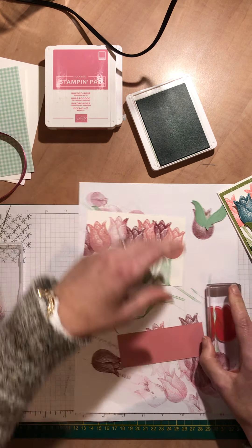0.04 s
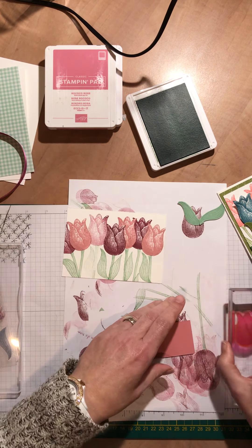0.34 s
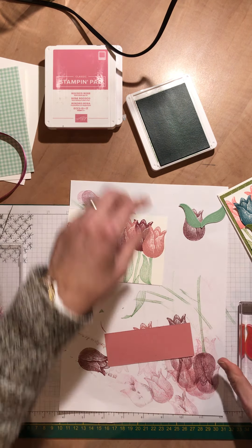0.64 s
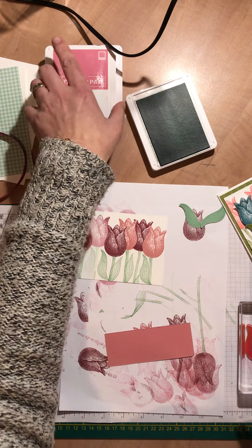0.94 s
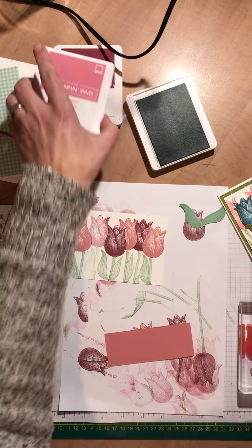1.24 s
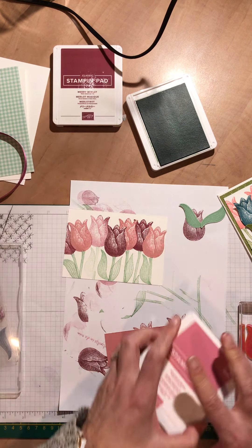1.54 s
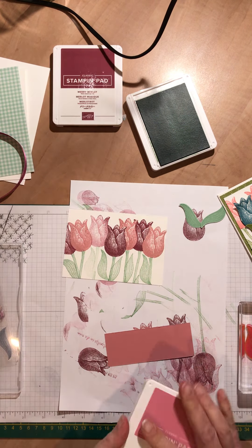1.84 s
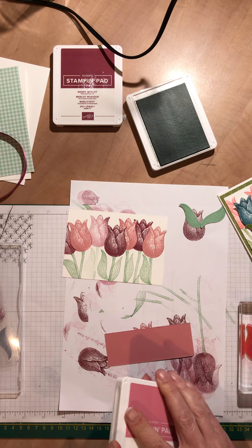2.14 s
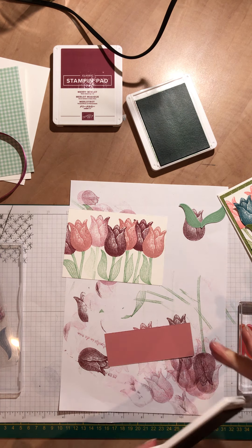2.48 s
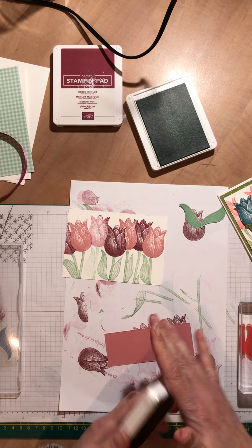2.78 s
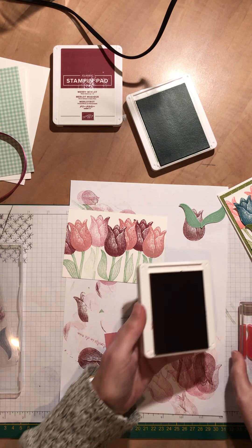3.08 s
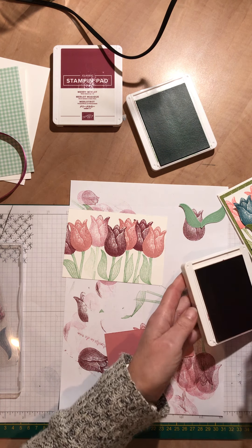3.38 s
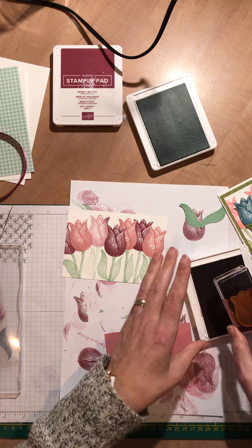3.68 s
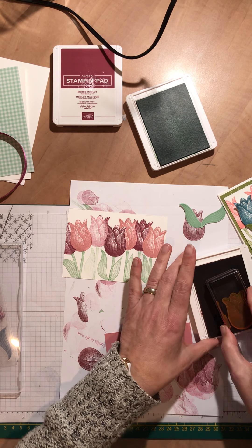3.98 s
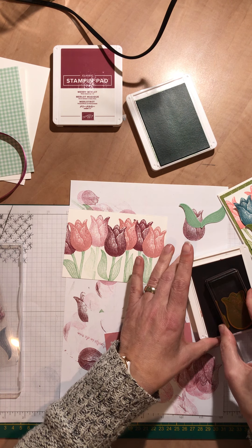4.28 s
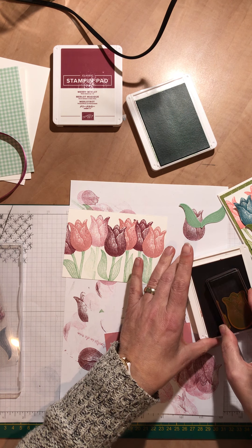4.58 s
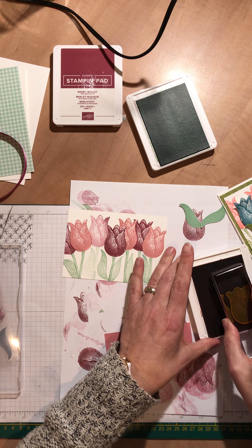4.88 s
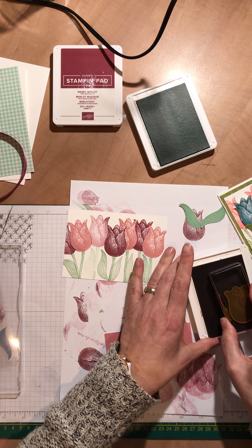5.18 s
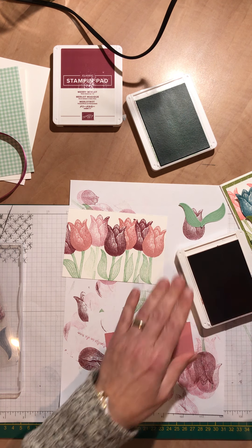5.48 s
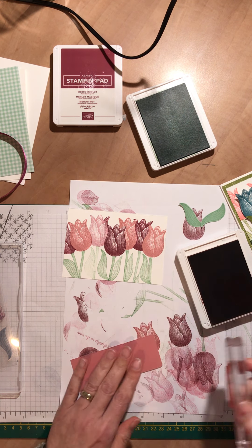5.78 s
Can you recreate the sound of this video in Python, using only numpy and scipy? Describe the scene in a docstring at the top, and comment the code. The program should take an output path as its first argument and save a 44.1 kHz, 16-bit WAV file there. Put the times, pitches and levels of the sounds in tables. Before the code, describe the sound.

A card rustles faintly over paper. A hollow plastic ink pad case is picked up with light clacks and scrapes, and its lid clicks, gives a tiny high squeak and snaps open. The case is set down on a wooden table, then a stamp block lands on it with a sharp, ringing crack and is dabbed in, each push a soft low thump. The card rustles again. The sounds are close, in a small, quiet room.

```python
"""A plastic ink pad case is handled on a wooden craft table: its hollow shell clacks and scrapes,
and its lid clicks, squeaks as it sticks and slips, and snaps open. The case is set down, then a
clear stamp block lands on the pad with a ringing crack and is dabbed into it.
Each push makes the table top boom softly. At the start and the end a card rustles over paper.
Underneath lie the short reverb and quiet rumble of a small room."""
import sys
import numpy as np
from scipy import signal
from scipy.fft import rfft, irfft
from scipy.io import wavfile
from scipy.ndimage import uniform_filter1d

SR = 44100
rng = np.random.default_rng(int(sys.argv[2]) if len(sys.argv) > 2 else 0)


def to_wav(s):
    """Save 16-bit WAV."""
    ch = np.atleast_2d(s).T  # columns
    pcm = np.round(np.clip(ch, -1, 1) * 32767)  # PCM
    wavfile.write(sys.argv[1], SR, pcm.astype(np.int16))


N = 261336
TIME = np.arange(N) / SR
HIT_TIME = np.arange(SR // 2) / SR  # seconds since a hit


def amp(db):
    """Decibels to gain."""
    return 10 ** (np.asarray(db) / 20)


def unit_rms(x):
    """Scales to rms 1."""
    return x / np.sqrt(np.mean(x ** 2) + 1e-20)


def curve_at(points, hz):
    """Reads a curve on a log-frequency axis."""
    f, value = np.transpose(points)
    return np.interp(np.log(hz + 1), np.log(f + 1), value)


def fade(t, t60):
    """Exponential decay, 60 dB down after t60 seconds."""
    return np.exp(-np.log(1000) * t / np.maximum(t60, 1e-3))


def add(mix, s, sound):
    """Mixes a sound in at s seconds."""
    start = round(s * SR)
    sound = sound[max(-start, 0):]
    part = mix[max(start, 0):][:len(sound)]
    part += sound[:len(part)]


def eq(x, curve):
    """Causal filter through (Hz, dB) points, so attacks stay sharp."""
    size = 4096
    log_gain = np.log(amp(curve_at(curve, abs(np.fft.fftfreq(size, 1 / SR)))))
    minimum_phase = np.exp(np.conj(signal.hilbert(log_gain)))
    taps = np.fft.ifft(minimum_phase).real
    return signal.fftconvolve(x, taps[:size // 2])[:len(x)]


def burst(decay):
    """Countless close, damped modes: dying noise of energy 1, its deepest notches filled."""
    spectrum = rfft(rng.standard_normal(len(HIT_TIME)) * fade(HIT_TIME, decay))
    evened = spectrum / np.sqrt(abs(spectrum) + 1e-12)
    x = irfft(evened, len(HIT_TIME)) * fade(HIT_TIME, decay * 10)
    return x / np.linalg.norm(x)


def ping(hz, t60):
    """One damped mode."""
    return np.sin(2 * np.pi * hz * HIT_TIME) * fade(HIT_TIME, t60)


def ring(modes):
    """Damped modes after one hit; neighbours swing against each other."""
    return sum((-1) ** k * amp(db) * ping(hz, t60) for k, (hz, db, t60) in enumerate(modes))


def friction(curve, grain_db, grain_s=0.0015):
    """A stream of tiny catches of uneven size, clumped where the surface is rougher."""
    catches = unit_rms(uniform_filter1d(rng.standard_normal(N), size=round(grain_s * SR)))
    clumps = unit_rms(uniform_filter1d(rng.standard_normal(N), size=400))
    grains = rng.standard_normal(N) * amp(grain_db * (catches + 0.53 * clumps))
    return unit_rms(eq(grains, curve))


def strokes(rows, layer):
    """Envelope for level column 0 or 1: each stroke sets in, swells or sags, and lets go."""
    gain = np.zeros(N)
    for s, length, *levels_db, swell_db in rows:
        t = TIME - s
        ease = .1 * length  # longer strokes start and stop more gently
        attack = np.maximum(-t, 0) / (.01 + ease)
        release = np.maximum(t - length, 0) / (.022 + ease)
        ramp_db = swell_db * (np.clip(t / length, 0, 1) - .5)
        gain += amp(levels_db[layer] + ramp_db - 20 * np.minimum(attack + release, 10))
    return gain


# Room tone EQ. Each row: frequency in Hz, gain in dB.
ROOM_TONE_EQ = [(15, -41.5), (25, -14.5), (59, 1), (141, -14.5), (242, -13.5), (277, -11.5), (394, -21),
                (476, -28), (560, -27), (988, -30.5), (1100, -32), (1330, -32.5), (2840, -37.5),
                (12200, -43), (16000, -46)]

def room_tone(level_db=-62):
    """A steady bed of low rumble and faint hiss."""
    return amp(level_db) * unit_rms(eq(rng.standard_normal(N), ROOM_TONE_EQ))


# Reverb decay. Each row: frequency in Hz, t60 in seconds.
REVERB_DECAY = [(100, 0.76), (300, 0.6), (800, 0.37), (2000, 0.39), (5000, 0.33), (13000, 0.24)]

def reverb(x, wet_db=-10.5, build_s=0.0032):
    """Dense wall reflections that swell quickly and die sooner in the treble."""
    hz, t, bands = signal.stft(rng.standard_normal(len(HIT_TIME)), SR, nperseg=256)
    bands *= fade(t, curve_at(REVERB_DECAY, hz)[:, None])
    tail = signal.istft(bands, SR, nperseg=256)[1][:len(HIT_TIME)]
    tail *= 1 - np.exp(-(HIT_TIME / build_s) ** 2)
    tail /= np.linalg.norm(tail)
    tail = eq(tail, [(100, -4), (300, 1), (800, 3), (2500, -.5), (5000, -3), (13000, -2)])
    return amp(wet_db) * signal.fftconvolve(x, tail)[:N]


# Low modes of the whole top. Each row: pitch in Hz, level in dB, t60 and rise in seconds.
BOOM_MODES = [(66.3, 12, 0.18, .022), (45.7, -11, .22, 0.018), (108, -19, 0.24, 0.0062)]
# The board's woody knock. Each row: pitch in Hz, level in dB, t60 in seconds.
BOARD_MODES = [(148, 1, .15), (239, -0.5, 0.2), (290.7, -1, .12), (393, -10, 0.14)]
# Blows that reach the table. Each row: start in seconds, boom and knock levels in dB.
TABLE_PUSHES = [(-.018, -46.5, -84), (.288, -48, -64), (0.554, -44.5, -68), (.612, -56, -66),
                (.968, -54.5, -50.5), (1.105, -55, -54), (3.3525, -41.5, -42.5), (3.6272, -29, -30),
                (4.0414, -34, -57.5), (4.844, -33, -58.5), (5.215, -27.5, -39.5), (5.322, -60, -52)]

def table_boom(echo_db=-9, round_trip_s=.0632):
    """A push sinks the table top, whose boom returns from the room; a hard blow also rings the board."""
    boom = 0
    for hz, db, t60, rise in BOOM_MODES:
        swell = 1 - np.exp(-(HIT_TIME / rise) ** 2)
        boom -= amp(db) * ping(hz, t60) * swell
    knock = ring(BOARD_MODES) * (1 - fade(HIT_TIME, 0.046))
    out = np.zeros(N)
    for s, boom_db, knock_db in TABLE_PUSHES:
        add(out, s, amp(knock_db) * knock)
        for trip in range(4):
            add(out, s + trip * round_trip_s, amp(boom_db + trip * echo_db) * boom)
    return out


# EQs for the paper's rustle, airy fizz and crisp flick. Each row: frequency in Hz, gain in dB.
RUSTLE_EQ = [(300, -27), (800, -10.5), (1500, -7.5), (3300, 2.5), (5500, -1.5), (8000, -15), (16000, -21.5)]
FIZZ_EQ = [(1500, -30.5), (3500, -16.5), (6000, -0.5), (9000, -2), (14000, -3.5), (16000, -2.5)]
FLICK_EQ = [(300, -39), (800, -21), (1500, -15), (3500, 1), (6000, -4), (9000, -4), (14000, 0),
            (16000, -13)]
# Card and hand slides. Each row: start and length in seconds, rustle, fizz and swell in dB.
CARD_SLIDES = [(0, 0.056, -60, -61, -6), (.08, .115, -61.5, -57, 3), (.225, 0.055, -68, -66, 2),
               (.283, 0.023, -53, -50, 6.5), (.562, 0.029, -64, -62, -4),
               (3.176, 0.035, -53.5, -50.5, -1.5), (4.665, 0.04, -65, -66.5, 12.5),
               (5.118, 0.025, -65.5, -64.5, -1.5), (5.327, 0.024, -62.5, -64.5, 2),
               (5.38, 0.071, -69.5, -66.5, 2), (5.724, .11, -57.5, -48.5, -6.5)]
# Fingertip flicks. Each row: start in seconds, relative level in dB, nominal decay in seconds.
PAPER_FLICKS = [(0.264, -25.5, .012), (0.284, -34, .02), (0.3064, -14.5, 0.009), (0.56, -36, .02),
                (3.1798, -10.5, 0.022), (3.2186, -18.5, 0.023), (5.33, -30, .02), (5.7073, -22.5, 0.0061)]

def card_on_paper(flick_db=1):
    """The sliding card rustles, its fibres fizz, and they snap where a finger catches."""
    out = strokes(CARD_SLIDES, layer=0) * friction(RUSTLE_EQ, grain_db=2)
    out += strokes(CARD_SLIDES, layer=1) * friction(FIZZ_EQ, grain_db=1.5)
    for s, db, decay in PAPER_FLICKS:
        add(out, s, amp(db + flick_db) * eq(burst(decay), FLICK_EQ))
    return out


# EQ of the shell's hollow rasp. Each row: frequency in Hz, gain in dB.
RASP_EQ = [(120, -33), (300, -10.5), (550, 2), (950, 0.5), (1600, -7), (2900, -7.5), (4200, -15.5),
           (6500, -23.5), (14000, -45.5)]
# Plastic dragging, and the block shifting on the pad.
# Each row: start and length in seconds, relative rasp and hiss levels in dB, swell in dB.
SCRAPES = [(.283, 0.0098, -60, -63, 0), (1.074, .034, -49.5, -64, -1.5), (1.12, 0.075, -66, -75, -4),
           (1.615, .03, -67, -77, -4), (1.902, 0.058, -67, -63, -7.5), (1.99, 0.023, -72, -69, -1),
           (2.314, .016, -44, -44, 3.5), (2.367, 0.013, -44, -47, -0.5), (2.44, .105, -58, -65, 8),
           (2.632, 0.041, -64, -61, 2.5), (2.675, 0.091, -58.5, -45.5, 1), (2.98, 0.09, -71.5, -67.5, 2),
           (3.43, .18, -67.5, -67.5, -3.5), (3.78, 0.24, -69, -91.5, -6.5), (5.33, 0.13, -66, -78, 0)]

def plastic_scrapes(level_db=-1):
    """Plastic scrapes on plastic: a hollow rasp in the shell and a fine hiss from the edges."""
    hiss_eq = [(500, -23.5), (2500, -3.5), (6000, -4.5), (10000, -5), (15000, -3.5)]
    rasp = strokes(SCRAPES, layer=0) * friction(RASP_EQ, grain_db=2.5)
    hiss = strokes(SCRAPES, layer=1) * friction(hiss_eq, grain_db=1.5)
    return amp(level_db) * (rasp + hiss)


# Lid squeaks. Each row: start and length in seconds, level in dB, slips per second, centre pitch in Hz.
LID_SQUEAKS = [(2.6758, .0095, -13, 700, 11790), (2.7601, .004, -12.5, 340, 13400),
               (2.766, .008, -7, 330, 13600), (2.7698, .008, -10, 280, 12020)]

def lid_squeaks(ring_t60=0.0097, grit_decay=.007):
    """The lid sticks and slips; each uneven slip rings its stiff track near the top of hearing."""
    out = np.zeros(N)
    for s, length, db, rate, hz in LID_SQUEAKS:
        grit_eq = [(hz * .45, -28), (hz * .85, -9), (hz * .88, 4), (hz * 1.32, 4), (hz * 1.16, -12)]
        for since in np.arange(0, length, 1 / rate):
            late, detune = rng.uniform(-1, 1, 2)
            tone = ping(hz * (1 + .025 * detune), ring_t60) * (1 - fade(HIT_TIME, 0.0011))
            grit = eq(burst(grit_decay), grit_eq)
            add(out, s + since + 0.16 * late / rate, amp(db) * fade(since, .08) * (tone + grit))
    return out


# EQ of the landing's crack. Each row: frequency in Hz, gain in dB.
CRACK_EQ = [(100, -18.5), (300, -6.5), (450, -7), (700, -2), (1000, 5.5), (1300, -3), (1900, -2),
            (2600, -4), (4000, -13), (6000, -11.5), (8500, -22.5), (16000, -38.5)]
# Block and case ringing together. Each row: pitch in Hz, relative level in dB, t60 in seconds.
STAMP_MODES = [(536, -8.5, 0.09), (698, -2.5, 0.078), (812, -5, 0.098), (919.5, -0.5, 0.049),
               (980, 0, 0.086), (1046, -6.5, 0.014), (1525, -5.5, 0.069)]

def stamp_landing(start_s=3.6288, crack_db=13, tick_db=3, body_db=-21):
    """The hard block meets the rim of the pad: a crack, a sharp tick and a ringing body."""
    crack = eq(burst(0.059), CRACK_EQ)
    tick = eq(burst(.009), [(800, 2), (3000, -3.5), (5500, 3.5), (9000, -13), (15000, -20.5)])
    body = ring(STAMP_MODES) * (1 - fade(HIT_TIME, 0.0077))
    out = np.zeros(N)
    add(out, start_s, amp(crack_db) * crack + amp(tick_db) * tick + amp(body_db) * body)
    return out


# The plastic shell's ring. Each row: pitch in Hz, relative level in dB, t60 in seconds.
SHELL_MODES = [(300, -2.5, 0.028), (540, -2, 0.068), (672, -1.5, 0.018), (1270, -2.5, 0.13),
               (1864, -7.5, .03), (2883, -0.5, 0.069)]
# Knocks and clicks of case and block. Each row: start in seconds, relative level in dB, weight
# (bass over mids) in dB, hardness (treble over mids) in dB, note of the struck spot in Hz.
CASE_KNOCKS = [(0.57, -22.5, -17, -19, 2400), (0.655, -30.5, -11, -2.5, 3540), (0.9652, -19, 12, -14, 443),
               (0.971, -12.5, 16, -24, 521), (1.04, -43.5, 0, 12.5, 7000), (1.103, -15.5, 10, -42, 488),
               (1.118, -13, 2, -23, 720), (1.23, -17, 10.5, -40, 940), (1.647, -1, 2.5, -13, 757),
               (2.2393, -10.5, 2.5, -12, 692), (2.307, -13, 5, -30.5, 450), (2.3136, -.5, 4, -13.5, 1380),
               (2.367, -1, -7.5, -29, 3080), (2.495, -17, -9.5, -17, 580), (2.52, -13, -9, -25.5, 1980),
               (2.5357, -7.5, -14, -21, 4295), (2.759, 1, 3, -6.5, 2954), (2.7677, -5.5, -3, 11, 1403),
               (2.779, 6, -3, -16.5, 835), (3.136, -38.5, 25.5, -7, 547), (3.352, 0.5, -1.5, -29.5, 1193),
               (3.613, -20.5, 7, -36, 880), (4.043, -21.5, 6, -42, 3390), (4.659, -28, 12.5, -17, 5870),
               (4.704, -22, 8.5, -20, 2980), (4.843, -28.5, 11, -12, 540), (4.929, -35, 5, 2, 2860),
               (5.121, -28.5, 16, -5.5, 562), (5.2144, -10.5, 10, -33, 950), (5.325, -27, 15, -11.5, 900)]

def case_knocks(level_db=-1.5, shell_db=-39, spot_db=-32):
    """Each knock rattles the shell: a lingering hollow part, a short hard part and the spot's note."""
    out = np.zeros(N)
    for s, db, weight_db, hard_db, spot_hz in CASE_KNOCKS:
        thud, body = db + weight_db, db + .55 * weight_db
        click, snap = db + .32 * hard_db, db + hard_db
        hollow_eq = [(110, thud - 16), (280, thud), (700, body), (1300, db - 3), (3000, db - 24)]
        hard_eq = [(600, db - 18), (1700, db), (4400, click + 1), (11000, snap), (16000, snap - 3)]
        decay = 0.053 * 2 ** (db / 43.5)  # stronger knocks ring longer
        modes = amp(shell_db) * ring(SHELL_MODES) + amp(spot_db) * ping(spot_hz, decay)
        hollow = eq(burst(decay * 1.4) + modes, hollow_eq)
        hard = eq(burst(decay * 0.9) + modes, hard_eq)
        add(out, s, amp(level_db) * (hollow + hard))
    return out


def scene():
    """Close handling sounds and their reverb, over the table's boom and the room tone."""
    handling = case_knocks() + lid_squeaks() + stamp_landing() + card_on_paper() + plastic_scrapes()
    return (room_tone() + table_boom() + reverb(handling) + handling)[None]


def record(dry, low_cut_hz=36, high_cut_hz=15950):
    """Rolls off the deepest bass and the very top."""
    low_cut = signal.butter(3, low_cut_hz, "high", fs=SR, output="sos")
    high_cut = signal.firwin(255, high_cut_hz, window=("kaiser", 8), fs=SR)
    return signal.oaconvolve(signal.sosfilt(low_cut, dry), high_cut[None], "same")


dry = scene()
out = record(dry)
to_wav(out)
```